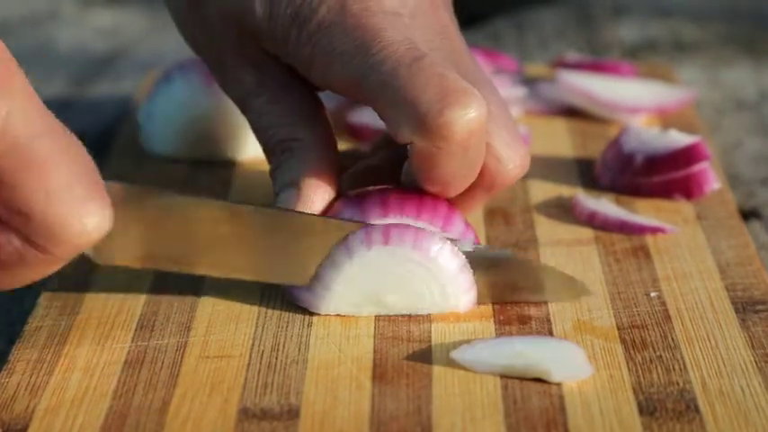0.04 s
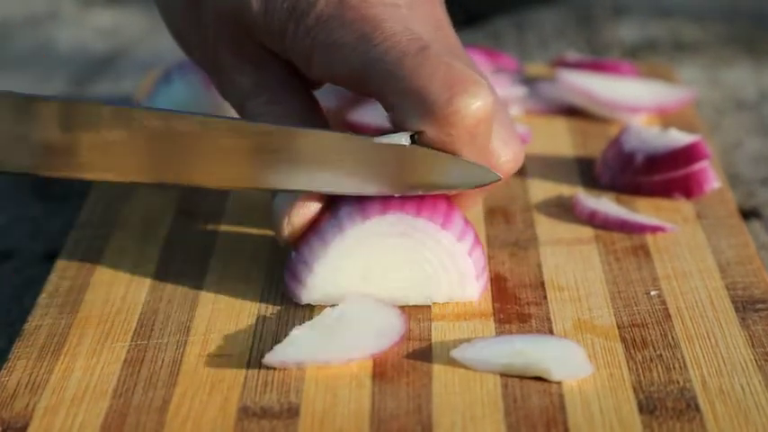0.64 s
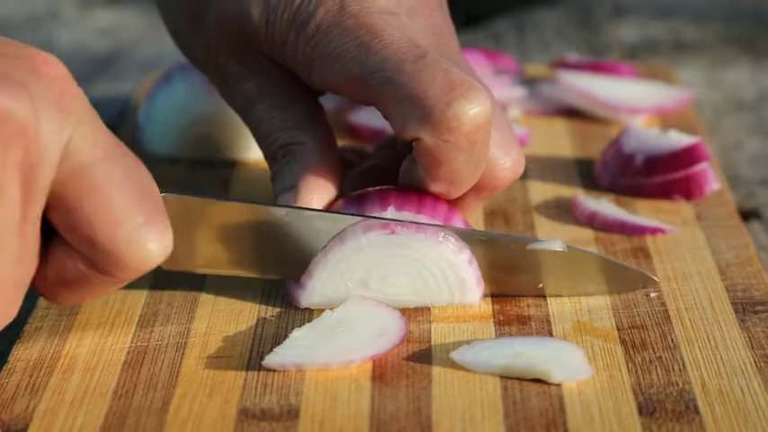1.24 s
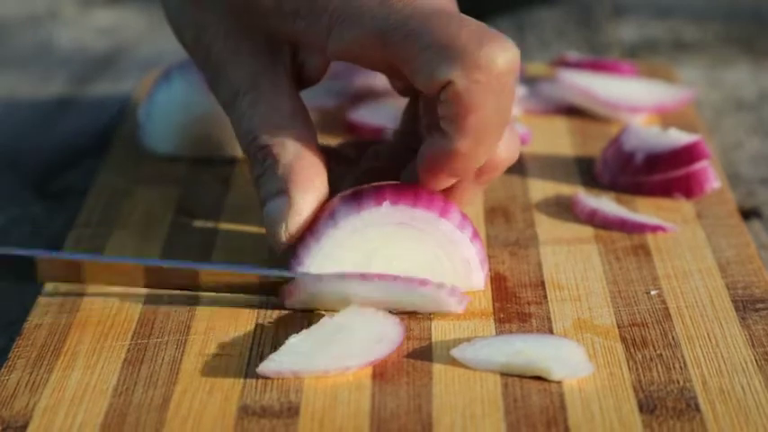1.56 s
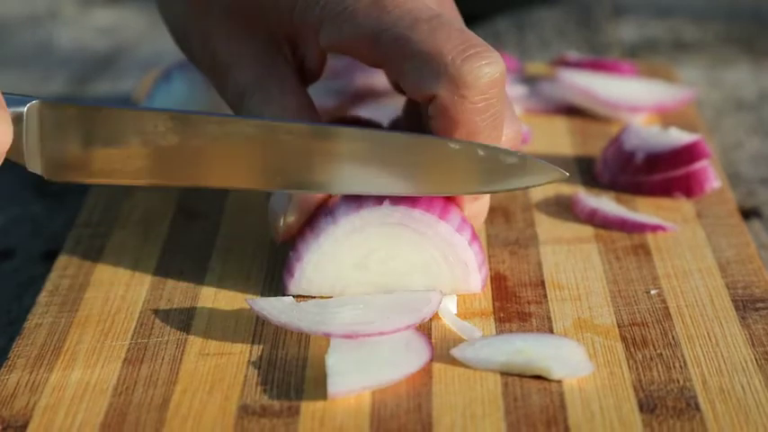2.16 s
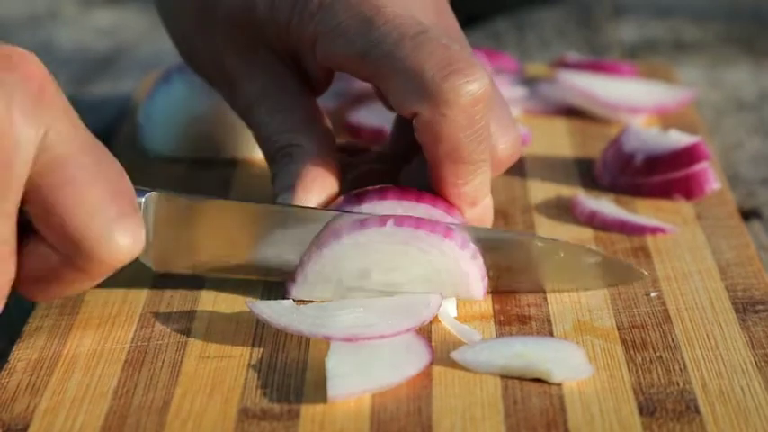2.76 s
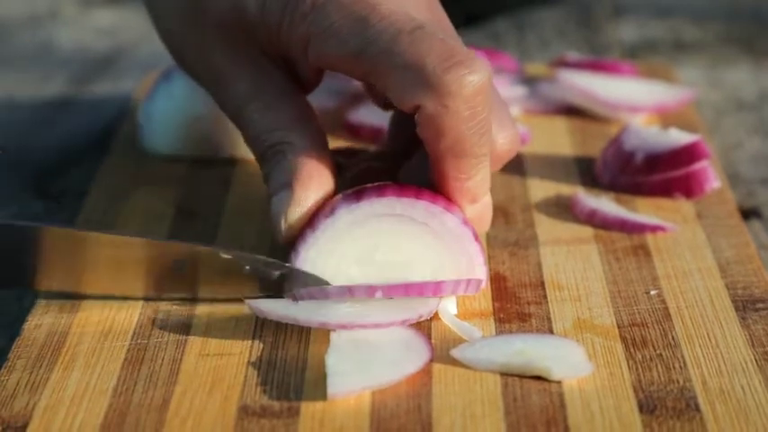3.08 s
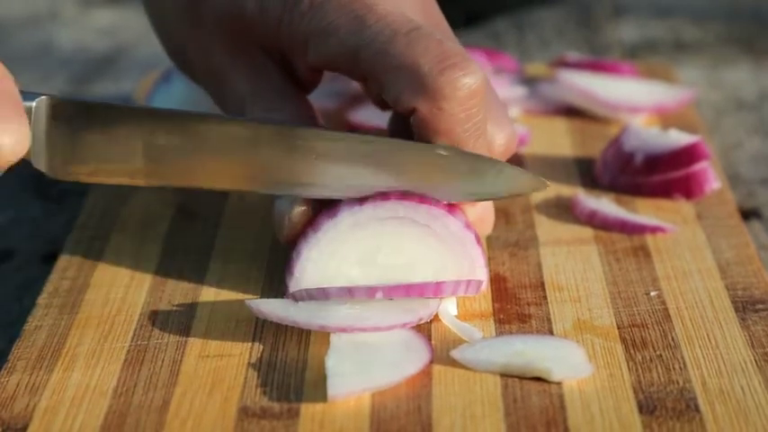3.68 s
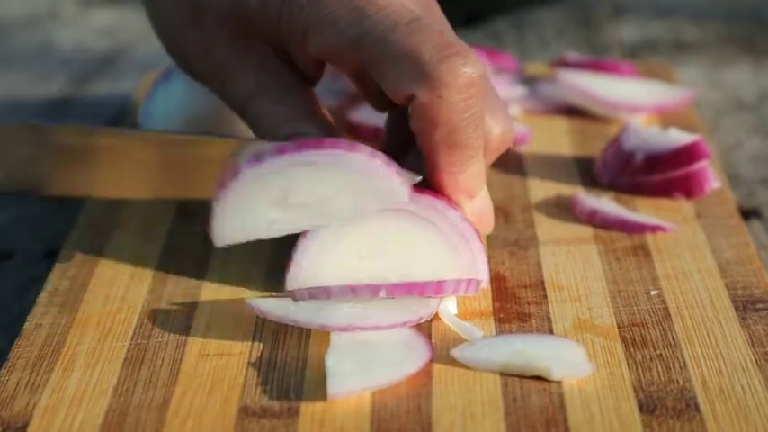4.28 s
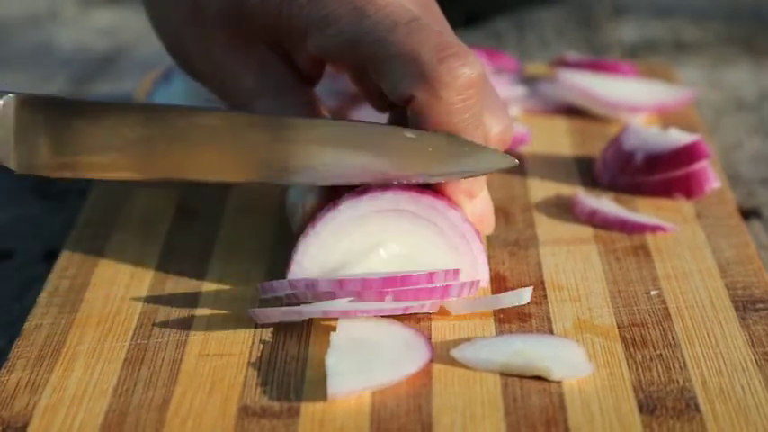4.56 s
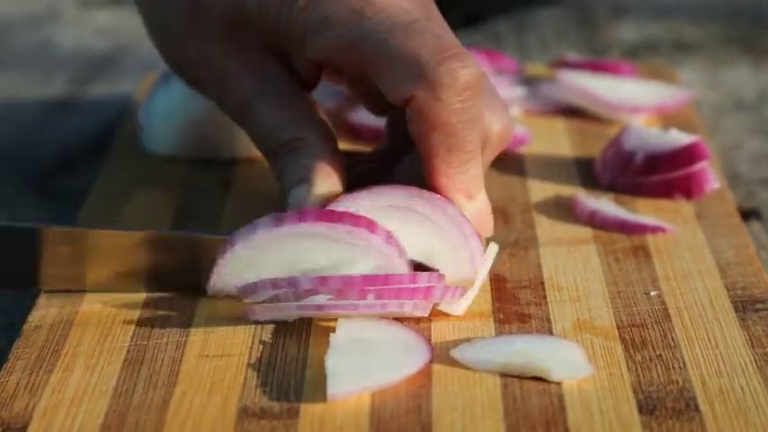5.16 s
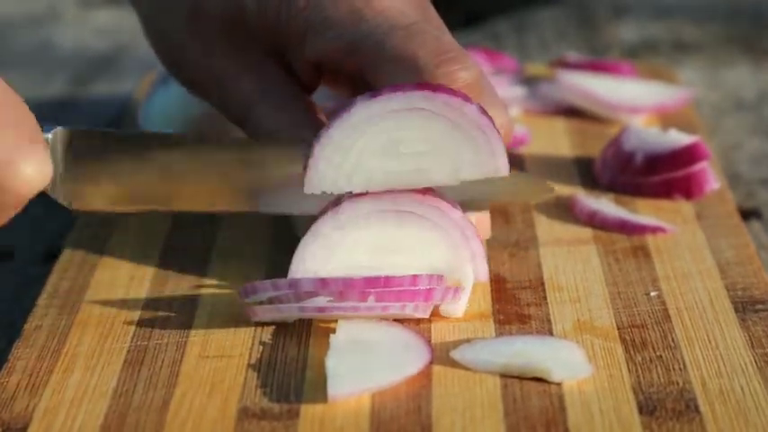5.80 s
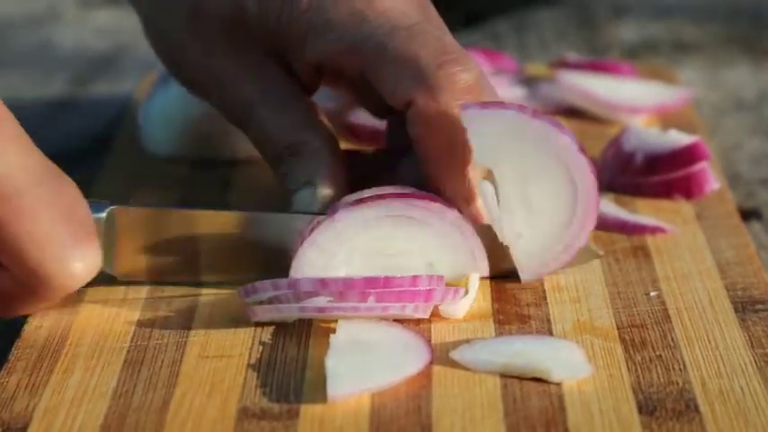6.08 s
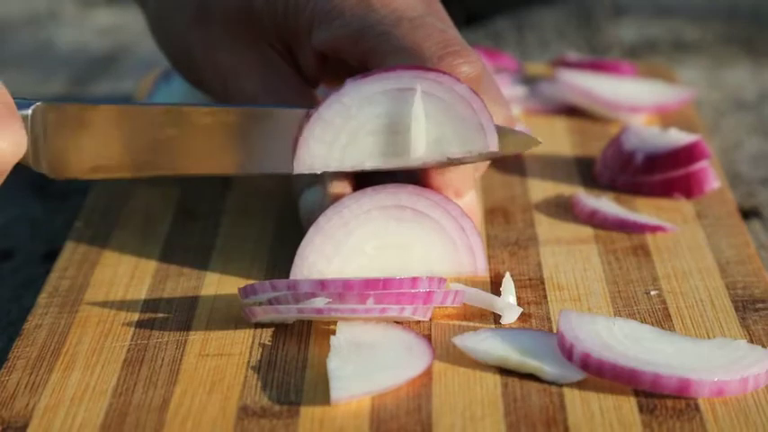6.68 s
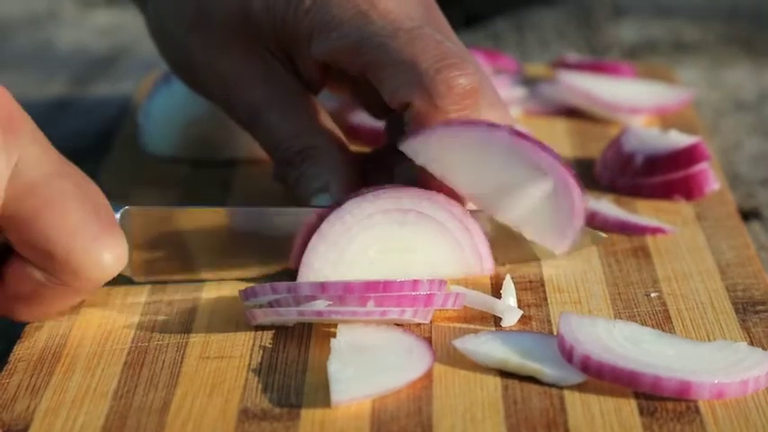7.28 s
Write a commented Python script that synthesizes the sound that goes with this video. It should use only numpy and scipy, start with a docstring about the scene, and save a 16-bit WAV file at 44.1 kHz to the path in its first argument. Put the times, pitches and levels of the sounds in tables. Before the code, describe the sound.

A large knife slices an onion on a wooden board, close to the microphone. After an opening knock, six cuts follow at a steady, unhurried pace. Each is a crisp, juicy crunch that ends in a sharp knock on the wood, then a short wet scrape as the blade draws back. Slices and fingers tap lightly between strokes, over soft outdoor air and a faint distant motor hum.

```python
"""Outdoors at a wooden board, a large knife slices an onion close by, over soft air and a far motor.
In each stroke the skin snaps and cells burst, a crunch whose jolts also drive the board into a drone.
The edge then strikes the board, exciting its modes, and is drawn back with a wet, fizzing scrape.
Slices peel off the steel as films of juice break; slices, fingers and blade tap the wood lightly."""
import sys
import numpy as np
from scipy import signal
from scipy.io import wavfile

SR = 44100
rng = np.random.default_rng(int(sys.argv[2]) if len(sys.argv) > 2 else 0)


def file_out(sig):
    """Save sig as 16-bit WAV at sys.argv[1]."""
    # one column per channel
    cols = np.atleast_2d(sig).T
    # limit, then scale
    lim = np.clip(cols, -1, 1)
    pcm = np.round(lim * 32767).astype(np.int16)
    wavfile.write(sys.argv[1], SR, pcm)


N = 328104
TIME = np.arange(N) / SR

# Impacts of the edge on the board, and the grinding that follows each:
# start_s, blow_db, high_modes_db, spot_mode_db, crack_db, thud_db, grind_db, fizz_db
KNOCKS = [(-0.02, -0.5, 11, -5.5, -8, -7.5, -40.5, -69), (1.2297, -1, -1, -6, -5.5, 2.5, -43.5, -61.5),
          (2.7441, -2, 3.5, -7.5, 7, 2.5, -38.5, -38), (3.8479, -2, 6.5, -7, 4.5, -2, -37, -53.5),
          (4.8982, -2.5, 2.5, -1.5, -0.5, -1, -38, -47), (5.9753, -2.5, -0.5, 0.5, -4, -2.5, -44.5, -55.5),
          (7.2936, 2.5, 0.5, 0, 0.5, 2, -43, -70)]
# Pulls of the blade back along the board:
# start_s, lift_s, scrape_db, swell_db, fizz_db, drying_db, scrape_fall_db_per_s, fizz_fall_db_per_s
PULLS = [(0.106, 0.171, -42.5, 0.5, -38, -2, 125, 300), (1.343, 1.464, -44, 7.5, -39, -1.5, 276, 450),
         (2.88, 3.04, -39.5, 7.5, -51, 10.5, 240, 230), (3.965, 4.136, -34, 16.5, -47, 4.5, 315, 340),
         (5.025, 5.167, -38, 7, -50, 4, 261, 290), (6.125, 6.216, -41.5, 4.5, -50, 0.5, 154, 134),
         (7.38, 7.436, -54.5, -3, -58, -7, 200, 200)]
# Spectra of bursting cells, the driven board and fizzing juice: frequency_hz, density_db
CRUNCH_SPECTRUM = [(600, -24.5), (1050, -3), (1300, 7), (1900, 3.5), (2400, 0.5), (4000, -1), (5600, -5),
                   (7500, 4.5), (8600, -0.5), (11000, 0), (13000, -1), (15000, -20.5)]
BOARD_SPECTRUM = [(60, -25.5), (160, -9.5), (210, -11.5), (360, -2), (440, -4.5), (580, 0.5), (650, -9),
                  (730, 2.5), (850, -5.5), (1000, -13), (1800, -40)]
JUICE_SPECTRUM = [(1500, -30), (2600, 0.5), (4200, -8), (5500, -12), (6600, 0.5), (7500, 0), (8600, -2.5),
                  (11000, -0.5), (13000, -6), (15000, -26)]


def knocking(spot_hz=870, crack_db=4, scuff_db=9, juice_db=-17, jolt_s=.008):
    """Impact excitation: the edge sets board and blade ringing; the point rings them more thinly."""
    # Modes struck by the edge, and by the point: frequency_hz, level_db, t60_s
    edge_modes = [(162, -40.5, .12), (268.6, -36.5, 0.097), (410, -24.5, .084), (446, -34.5, 0.26),
                  (497, -30.5, .1), (570, -22, 0.037), (710.7, -12, 0.043), (878, -10.5, 0.084),
                  (1139, -18.5, 0.047), (1282, -16, 0.037), (1640, -27.5, 0.039), (2100, -10.5, 0.013),
                  (2400, -3.5, 0.012), (2656, -9, 0.02), (2848, -6, 0.012), (3720, -9.5, 0.011),
                  (3823, -15, 0.01), (4960, -28, 0.014), (5900, -17.5, 0.0022), (7600, -29.5, 0.0055)]
    point_modes = [(326, -16.5, 0.13), (387, -18, 0.26), (895, -6, 0.07), (1009, -12.5, 0.14),
                   (1530, -8, 0.015), (1875, -3, 0.02), (2230, 6, 0.012), (3420, -7.5, 0.028),
                   (3860, -9.5, 0.014), (5260, 0.5, 0.012), (6670, -8.5, 0.018), (7500, -6.5, 0.012),
                   (11400, -14, .012)]
    # The point flicks the board and bounces: start_s, level_db
    flicks = [(1.8274, -23), (1.836, -29.5)]
    out = np.zeros(N)
    for start, db, high_db, spot_db, crack_extra_db, thud_db, _, _ in KNOCKS:
        # the mode near spot_hz depends most on where the edge lands
        modes = [(hz, mode_db + spot_db * (abs(hz / spot_hz - 1) < .1), t60)
                 for hz, mode_db, t60 in edge_modes]
        crack = butter(puff(t60=0.015, size=SR // 2), 3800, "high")
        crack = amp(crack_extra_db + crack_db) * butter(crack, 10000, order=3)
        add(out, start, amp(db) * (ring(modes, high_db) + crack))
        # the board jolts on its support; juice fizzes as the slice parts
        add(out, start + jolt_s, amp(thud_db) * colour(puff(t60=0.091, size=8192), BOARD_SPECTRUM))
        add(out, start, amp(juice_db) * colour(puff(t60=.16, size=8192), JUICE_SPECTRUM))
    for start, db in flicks:
        add(out, start, amp(db) * ring(point_modes))
        add(out, start, amp(db + scuff_db) * colour(puff(t60=0.025), CRUNCH_SPECTRUM))
    return butter(out, 180, "high")


def cutting(fibre_db=-9, drone_db=-5, resonance_db=-3, width_hz=160):
    """Fracture and forced vibration: cells burst and fibres crack, and the loaded board drones."""
    crunch_gain, drone_gain, centre_hz = cut_envelopes()
    cells = bursts(per_s=4600, spread_db=1.5, clump_db=3, clump_hz=140.4)
    fibres = amp(fibre_db) * bursts(per_s=200, spread_db=-1.3, clump_db=2, clump_hz=40)
    crunch = unit(colour(cells + fibres, CRUNCH_SPECTRUM))
    resonance = resonate(rng.standard_normal(N), centre_hz, width_hz)
    resonance = resonate(resonance, centre_hz, width_hz)
    drone = amp(drone_db) * unit(colour(cells + fibres, BOARD_SPECTRUM))
    drone += amp(resonance_db) * unit(resonance)
    return crunch * crunch_gain + drone * drone_gain


def cut_envelopes(bite_s=.0058, skin_db=-8, burst_db=5, unload_db=-4, rise_hz=50):
    """Loading: crunch and drone grow with depth until the last layer bursts and unloads the board."""
    # Passes through the onion: touch_s, sink_s, crunch_db, swell_db, drone_db, skin_drone_db, centre_hz
    cuts = [(1.088, 1.115, -39.5, 7.5, -40, -9, 675), (2.569, 2.617, -37, 5.5, -36, -9, 650),
            (3.677, 3.752, -35, 8.5, -33.5, -8.5, 720), (4.69, 4.768, -34.5, 5.5, -37, -1.5, 720),
            (5.726, 5.778, -36.5, 6.5, -37, -8.5, 730), (7.106, 7.16, -37, 5.5, -38.5, -2, 735)]
    # The edge stalls in the skin: start_s, length_s, crunch_db, drone_db, centre_hz, fall_db_per_s
    stalls = [(0.882, .08, -44, -41, 583, 379), (6.94, .085, -53, -52, 720, 249)]
    crunch, drone = np.zeros(N), np.zeros(N)
    centre_hz = np.full(N, float(cuts[0][-1]))
    for touch, sink, crunch_db, swell_db, drone_db, skin_drone_db, hz in cuts:
        next_knock = min(row[0] for row in KNOCKS if row[0] > touch)
        stop = next_knock - .004  # the flesh is through just before the knock
        gate = envelope(touch, stop, bite_s, fall_db_per_s=1200.5)
        depth = progress(sink, stop) - .5  # zero halfway down
        in_skin = 1 - progress(sink - .016, sink)
        last_layer = progress(stop - .054, stop)
        crunch += gate * amp(crunch_db + swell_db * depth + skin_db * in_skin + burst_db * last_layer)
        loading_db = .6 * swell_db * depth + unload_db * last_layer
        drone += gate * amp(drone_db + loading_db + skin_drone_db * in_skin)
        centre_hz = np.where(TIME > touch - bite_s, hz + rise_hz * depth, centre_hz)
    for start, length, crunch_db, drone_db, hz, fall in stalls:
        gate = envelope(start, start + length, bite_s, fall)
        crunch += gate * amp(crunch_db)
        drone += gate * amp(drone_db)
        centre_hz = np.where(gate > .1, hz, centre_hz)
    return crunch, drone, centre_hz


def snapping(crack_trim_db=-0.5, thud_trim_db=-2.5):
    """Brittle fracture: a layer gives way with a click, a fraying burst and a thud in the board."""
    # Breaks of skin and layers: start_s, crack_db, thud_db, t60_s
    snaps = [(0.0986, -11.5, -32.5, .004), (0.119, -10, -30, 0.0068), (0.136, -9, -27, 0.0074),
             (0.1486, -11, -23, .004), (0.157, -10.5, -27, 0.011), (0.176, -10, -29, 0.0022),
             (0.8796, -18, -18, 0.011), (0.891, -14, -20, .02), (0.905, -13, -8.5, 0.0078),
             (0.919, -10, -4, 0.027), (1.2676, 1, -22, 0.024), (1.2841, -8.5, -26, 0.019),
             (1.3714, 1, -20, 0.016), (1.402, -9.5, -41, .003), (2.5698, -8, -9, 0.023),
             (2.616, -12, -10, .014), (3.675, -13, -14.5, 0.042), (3.724, -15, -20, 0.022),
             (3.982, -12, -26, .011), (4.4196, -17.5, -35.5, .003), (4.684, -20.5, -22, .009),
             (4.696, -12.5, -17.5, 0.019), (4.8855, -3, -10, .006), (5.002, -21, -38, 0.0042),
             (5.723, -23, -13.5, .0063), (6.938, -13, -15, 0.023), (7.1105, -11, -9, .0074),
             (7.188, -13, -13, 0.015)]
    # Spectrum of a break: frequency_hz, density_db
    snap_spectrum = [(500, -4), (1300, 1), (2600, 2.5), (5000, -5), (6500, 0.5), (7600, 10), (8600, -1),
                     (11000, 1.5), (13500, -8), (16000, -20)]
    cracks, thuds = np.zeros(N), np.zeros(N)
    for start, crack_db, thud_db, t60 in snaps:
        tear = puff(t60)
        tear[0] += 1  # the opening click
        add(cracks, start, amp(crack_db + crack_trim_db) * tear / np.linalg.norm(tear))
        add(thuds, start, amp(thud_db + thud_trim_db) * puff(t60=.022))
    return colour(cracks, snap_spectrum) + colour(thuds, BOARD_SPECTRUM)


def pulling(scrape_db=-2.5, steel_db=-4, fizz_db=-1, pop_db=-7, sag_per_s=0.4, run_out_s=0.15):
    """Sliding friction: wood grain excites the blade while its wet flat fizzes out of the onion."""
    # Resonances of the sliding blade, run_out_s after it lifts: frequency_hz, width_hz, level_db
    blade_modes = [(1190, 130, 4), (1765, 130, -1), (2180, 68, 4.5), (2550, 75, 4), (2940, 57, 2.5),
                   (4306, 160, -14.5), (6430, 170, -5.5), (7100, 160, -17.5)]
    # Spectrum of steel rubbing on wood: frequency_hz, density_db
    scrape_spectrum = [(150, -23.5), (550, -7), (720, 1), (880, 4), (1020, -6.5), (1250, -7), (1650, -13.5),
                       (2300, -0.5), (3100, -10), (4000, -17), (6000, -22), (12000, -45.5)]
    scrape_gain, fizz_gain = pull_envelopes()
    grain = bursts(per_s=3000, spread_db=1.5, clump_db=1, clump_hz=110)
    juice = bursts(per_s=2500, spread_db=0.5, clump_db=3.5, clump_hz=119)
    juice += amp(pop_db) * bursts(per_s=160, spread_db=1.5, clump_db=0, clump_hz=30)
    # the free length of steel grows, so its resonances sink; the hand makes them waver
    ends = np.array([row[1] for row in PULLS]) + run_out_s
    current_pull = np.minimum(np.searchsorted(ends, TIME), len(ends) - 1)
    tuning = 1 + sag_per_s * (ends[current_pull] - TIME) + .012 * drift(hz=14)
    steel = sum(amp(db) * resonate(grain, hz * tuning, width) for hz, width, db in blade_modes)
    scrape = amp(scrape_db) * unit(colour(rng.standard_normal(N), scrape_spectrum))
    fizz = amp(fizz_db) * unit(colour(juice, JUICE_SPECTRUM))
    return (scrape + amp(steel_db) * unit(steel)) * scrape_gain + fizz * fizz_gain


def pull_envelopes(grind_delay_s=.031, grind_hold_s=.005, pull_rise_s=.029):
    """Friction follows speed and wetness: the edge grinds on landing; most pulls quicken and run dry."""
    scrape, fizz = np.zeros(N), np.zeros(N)
    for landing, *_, grind_db, fizz_db in KNOCKS:
        start = landing + grind_delay_s
        gate = envelope(start, start + grind_hold_s, rise_s=.0058, fall_db_per_s=299)
        scrape += gate * amp(grind_db)
        fizz += gate * amp(fizz_db)
    for start, lift, scrape_db, swell_db, fizz_db, drying_db, scrape_fall, fizz_fall in PULLS:
        to_go = 1 - progress(start, lift)
        scrape += envelope(start, lift, pull_rise_s, scrape_fall) * amp(scrape_db - swell_db * to_go)
        fizz += envelope(start, lift, pull_rise_s, fizz_fall) * amp(fizz_db + drying_db * to_go)
    return scrape, fizz


def tapping(tap_db=17, bass_trim_db=6, treble_trim_db=-2):
    """Damping rises with frequency: after a soft contact the bass lingers and the treble dies at once."""
    # Slices, fingers and blade touch the board: start_s, level_db, treble_db, bass_db
    taps = [(0.555, -44, -23, 2.5), (0.627, -31.5, -30, -15), (0.652, -38, -30, 4), (0.684, -45, -24, -2),
            (1.582, -46, -2.5, -19), (1.615, -51, -7, 10.5), (1.717, -43, -6, 3.5), (1.772, -31, -7, -0.5),
            (2.048, -36.5, -18, -10), (2.13, -38, -2, -29), (2.297, -41, -6, -3), (2.814, -28, 5.5, -23),
            (2.844, -34.5, -2, -21), (3.941, -30.5, 7, -6), (4.398, -43.5, -12, 1.5),
            (6.422, -45, -22.5, 3.5), (6.478, -40.5, -41.5, -2), (6.583, -36, -19, -3),
            (7.355, -26, -25, -17)]
    # Spectrum of the tapped wood: frequency_hz, density_db
    tap_spectrum = [(60, -28), (170, -3), (330, 0), (420, 6.5), (560, -2.5), (700, 1), (1030, 3.5),
                    (1550, -1), (1850, -1), (2100, -3.5), (2450, -4.5), (3600, -2), (12000, -16),
                    (16000, -28.5)]
    out = np.zeros(N)
    for start, db, treble_db, bass_db in taps + grip_shifts():
        wood = butter(puff(t60=0.044), 2670, order=6)
        bass = amp(bass_db + bass_trim_db) * butter(puff(t60=0.17), 700, order=4)
        slap = amp(treble_db + treble_trim_db) * butter(puff(t60=0.016), 2800, "high")
        add(out, start, amp(db + tap_db) * (wood + bass + slap))
    return colour(out, tap_spectrum)


def grip_shifts(per_s=2.5, level_db=-54, spread_db=0.5, treble_db=-17, bass_db=3):
    """Random arrivals: rows of faint taps as the fingers shift their grip."""
    draws = rng.random((round(per_s * N / SR), 2))
    return [(when * N / SR, level_db + spread_db * (2 * size - 1), treble_db, bass_db)
            for when, size in draws]


def peeling(peel_db=-3.5, tink_db=-7):
    """Film rupture: juice breaks between slice and steel, and each break rings the thin blade."""
    # Slices peel off, louder until they let go: release_s, level_db, build_up_s
    peels = [(0.824, -54, 0.054), (1.666, -50.5, 0.095), (1.756, -47.5, 0.1), (1.888, -41.5, 0.0054),
             (2.075, -49.5, 0.012), (6.335, -50, .02)]
    # High resonances of the free blade: frequency_hz, width_hz, level_db
    tink_modes = [(4950, 120, -6), (6900, 360, -1), (9860, 130, 1), (10400, 130, -1)]
    films = bursts(per_s=1000, spread_db=3.5, clump_db=4, clump_hz=78.4)
    gain = sum(amp(db) * envelope(release, release, build_up, fall_db_per_s=1000)
               for release, db, build_up in peels)
    tink = sum(amp(db) * resonate(films, np.full(N, hz), width) for hz, width, db in tink_modes)
    return (amp(peel_db) * unit(colour(films, JUICE_SPECTRUM)) + amp(tink_db) * unit(tink)) * gain


def reflections(x, dull_db=-20, bright_db=-28):
    """Early reflection: near surfaces return dull echoes and a thin scatter, with no long tail."""
    # Echoes from near surfaces: delay_s, gain
    echoes = [(.0042, -0.17), (.0082, 0.3)]
    response = np.zeros(SR // 2)
    for delay, gain in echoes:
        add(response, delay, np.array([gain]))
    add(response, .008, amp(dull_db) * puff(t60=0.23, size=16384))
    response = butter(response, 1500, order=4)
    add(response, .003, amp(bright_db) * puff(t60=0.13, size=16384))
    return signal.oaconvolve(x, response)[:N]


def open_air(level_db=-56.5, swell_db=-1.6):
    """Broadband noise: soft air and microphone hiss, fluttering slightly in level."""
    # Spectrum of air and hiss: frequency_hz, density_db
    air_spectrum = [(15, -2), (35, 15), (52, -2.5), (85, -0.5), (150, 3.5), (200, 1.5), (270, -1.5),
                    (600, -7), (1500, -11), (3000, -17.5), (5400, -26.5), (7200, -22), (8500, -25.5),
                    (10500, -20.5), (15500, -27)]
    gain = amp(level_db + swell_db * drift(hz=6))
    return gain * unit(colour(rng.standard_normal(N), air_spectrum))


def far_motor(pitch_hz=210, waver=.025, level_db=-58.5, peak_s=2.0):
    """Frequency modulation: the hum of a far motor wavers as it comes up and slowly recedes."""
    cycles = np.cumsum(pitch_hz * (1 + waver * drift(hz=6.8))) / SR
    nearness = envelope(peak_s, peak_s, rise_s=.55, fall_db_per_s=0.63)
    return amp(level_db) * nearness * np.sin(2 * np.pi * cycles)


def ring(modes, high_db=0, split_hz=1800, detune=.007, uneven_db=0.67):
    """Modal superposition: damped sines, a little different at each blow, alternating in sign."""
    t = np.arange(SR // 2) / SR
    hz, db, t60 = np.transpose(modes)[:, :, None]
    shift, share = rng.standard_normal((2, len(modes), 1))
    sign = (-1) ** np.arange(len(modes))[:, None]
    start_db = db + high_db * (hz > split_hz) + uneven_db * share
    decay = amp(start_db - 60 * t / t60)
    return (sign * decay * np.sin(2 * np.pi * hz * (1 + detune * shift) * t)).sum(0)


def resonate(x, hz, width_hz):
    """Driven resonance whose centre follows the curve hz."""
    carrier = np.exp(2j * np.pi * np.cumsum(hz) / SR)
    pole = np.exp(-np.pi * width_hz / SR)
    return 2 * (carrier * signal.lfilter([1 - pole], [1, -pole], x / carrier)).real


def bursts(per_s, spread_db, clump_db, clump_hz):
    """Shot noise: tiny clicks of uneven size that swell in clumps."""
    size = amp(spread_db * np.minimum(rng.exponential(1, N), 4) + clump_db * drift(clump_hz))
    return unit(size * rng.choice([-1, 1], N) * (rng.random(N) < per_s / SR))


def puff(t60, size=4096):
    """Exponentially decaying noise of unit energy."""
    burst = rng.standard_normal(size) * amp(-60 * np.arange(size) / SR / t60)
    return burst / np.linalg.norm(burst)


def drift(hz):
    """Random fluctuation below hz, of unit rms."""
    return unit(butter(rng.standard_normal(N), hz))


def colour(x, spectrum, size=4096):
    """Minimum-phase filter of unit energy, shaped like the given spectrum."""
    hz, db = np.transpose(spectrum)
    bin_hz = abs(np.fft.fftfreq(size, 1 / SR)) + 1
    log_gain = np.log(amp(np.interp(np.log(bin_hz), np.log(hz), db)))
    response = np.fft.ifft(np.exp(np.conj(signal.hilbert(log_gain)))).real[:size // 2]
    return signal.oaconvolve(x, response / np.linalg.norm(response))[:len(x)]


def butter(x, hz, kind="low", order=2):
    """Maximally flat low-pass or high-pass."""
    return signal.sosfilt(signal.butter(order, hz, kind, fs=SR, output="sos"), x)


def envelope(start, stop, rise_s, fall_db_per_s):
    """Linear rise until start, hold until stop, then exponential decay."""
    attack = np.clip(1 + (TIME - start) / rise_s, 0, 1)
    return attack * amp(-fall_db_per_s * np.maximum(TIME - stop, 0))


def progress(start, stop):
    """Linear ramp from zero to one between two times."""
    return np.clip((TIME - start) / max(stop - start, 1 / SR), 0, 1)


def amp(db):
    """Decibels to amplitude."""
    return 10 ** (np.asarray(db) / 20)


def unit(x):
    """Normalisation to unit rms."""
    return x / np.sqrt(np.mean(x ** 2) + 1e-20)


def add(mix, start_s, sound):
    """Superposes a sound on the mix at start_s."""
    at = round(start_s * SR)
    sound = sound[max(-at, 0):]
    part = mix[max(at, 0):][:len(sound)]
    part += sound[:len(part)]


def scene():
    """Superposition of the knife work, its reflections and the background, in one channel."""
    work = cutting() + pulling() + peeling() + snapping() + tapping() + knocking()
    return (work + reflections(work) + open_air() + far_motor())[None]


def record(dry, low_cut_hz=60, band_limit_hz=15700):
    """Overload: the hardest knocks clip; a low cut and a band limit follow."""
    clipped = butter(np.clip(dry, -1, 1), low_cut_hz, "high")
    low_pass = signal.firwin(201, band_limit_hz, window=("kaiser", 8), fs=SR)
    return signal.oaconvolve(clipped, low_pass[None], "same")


dry = scene()
out = record(dry)
file_out(out)
```